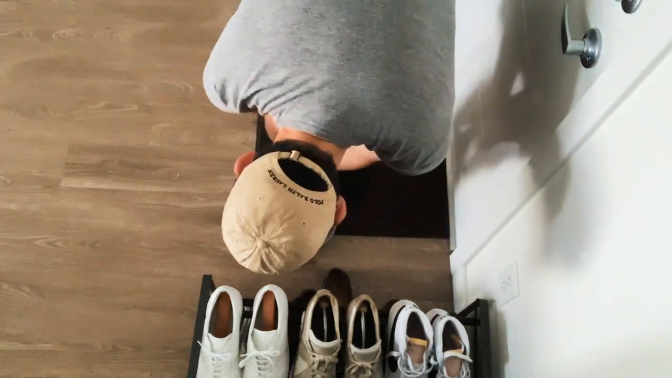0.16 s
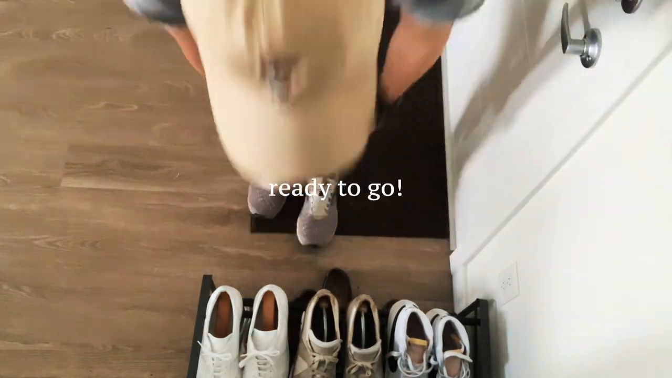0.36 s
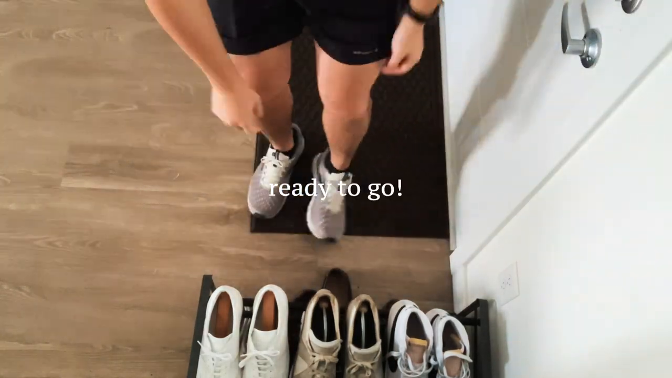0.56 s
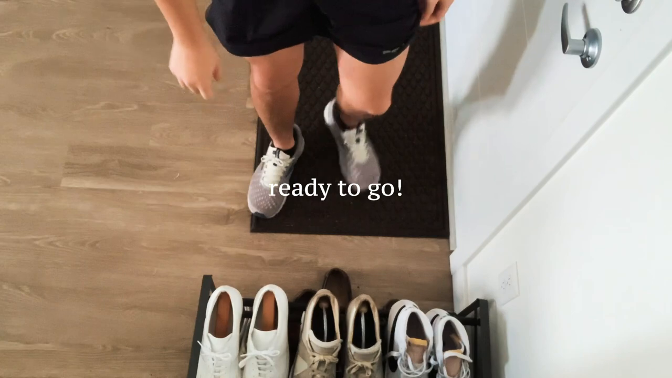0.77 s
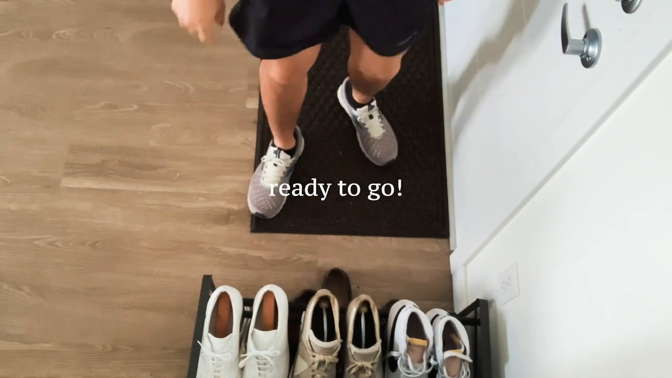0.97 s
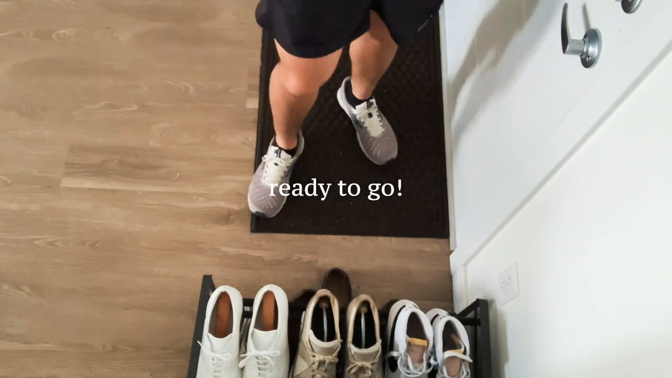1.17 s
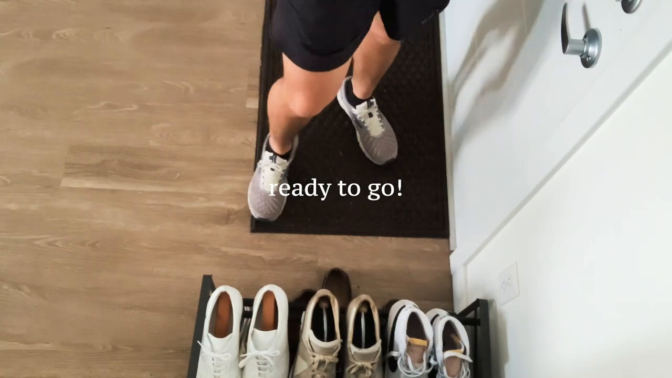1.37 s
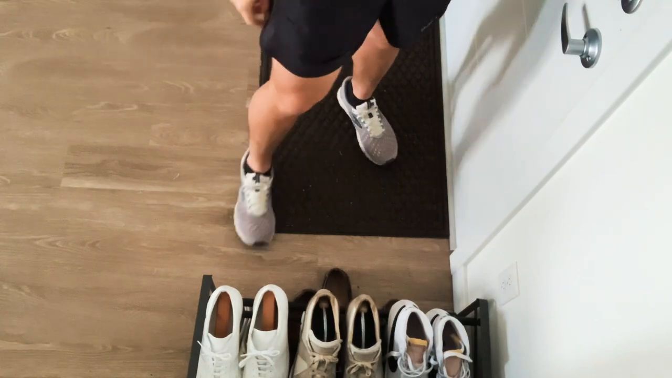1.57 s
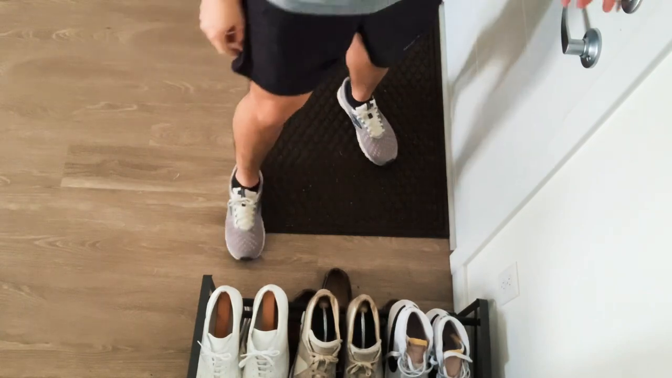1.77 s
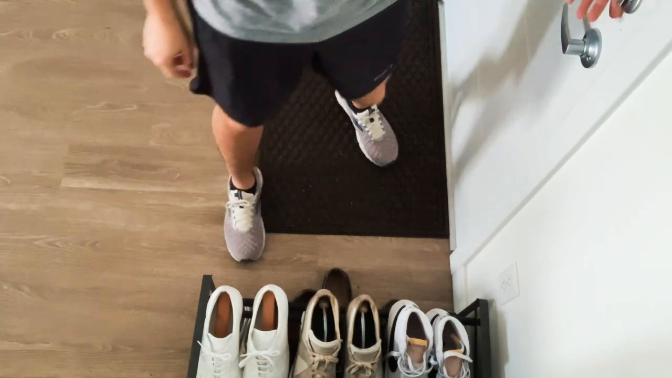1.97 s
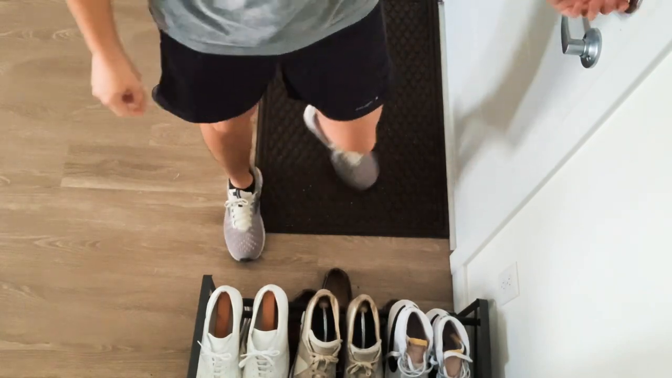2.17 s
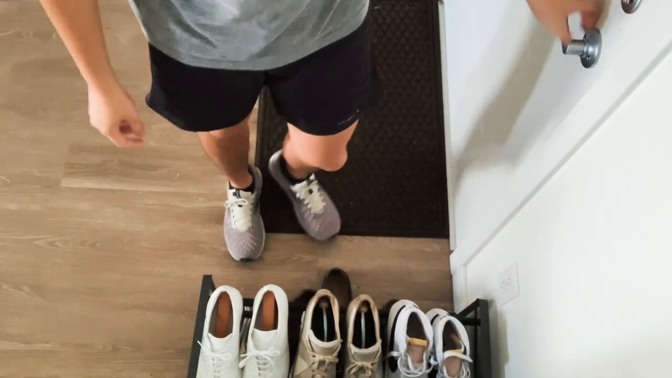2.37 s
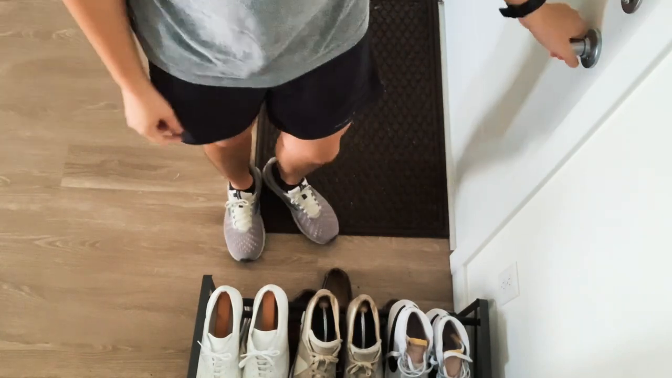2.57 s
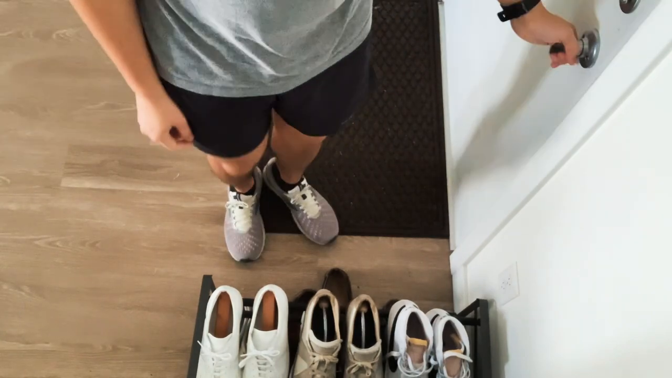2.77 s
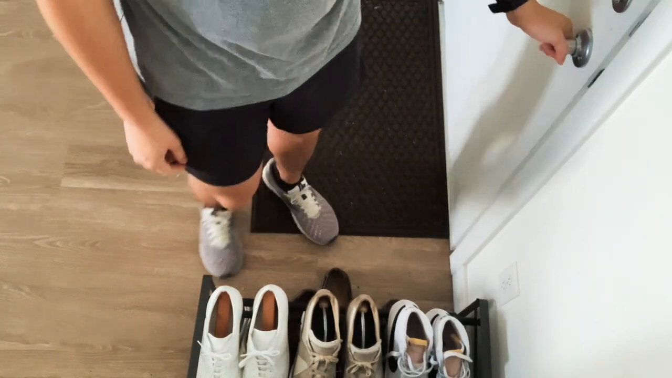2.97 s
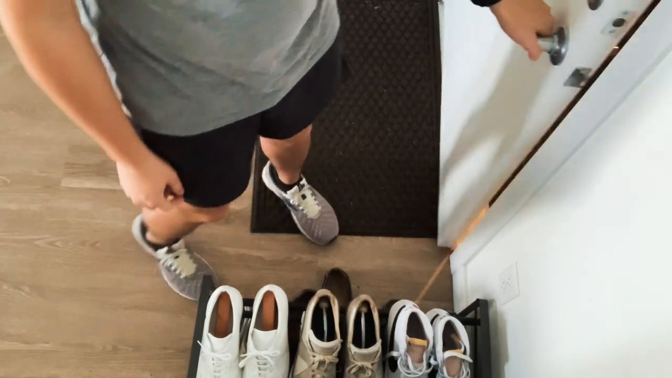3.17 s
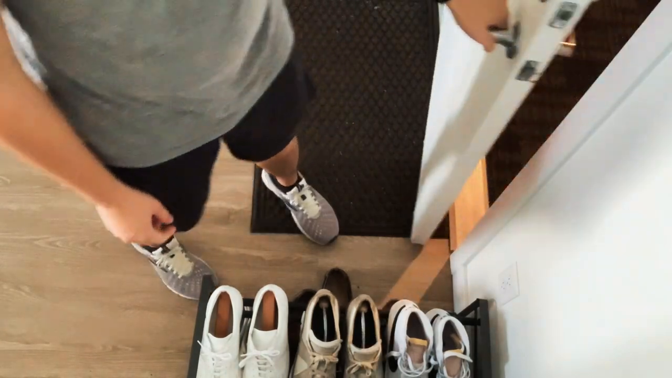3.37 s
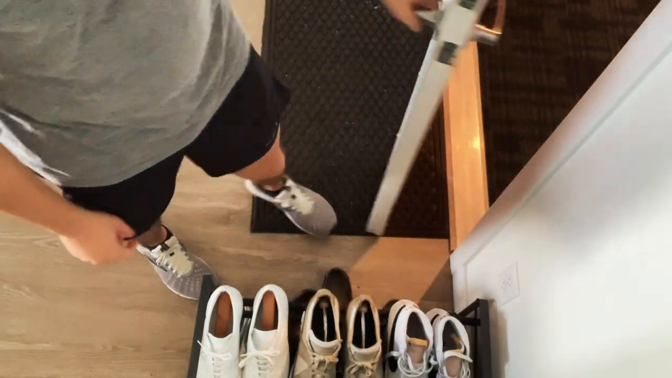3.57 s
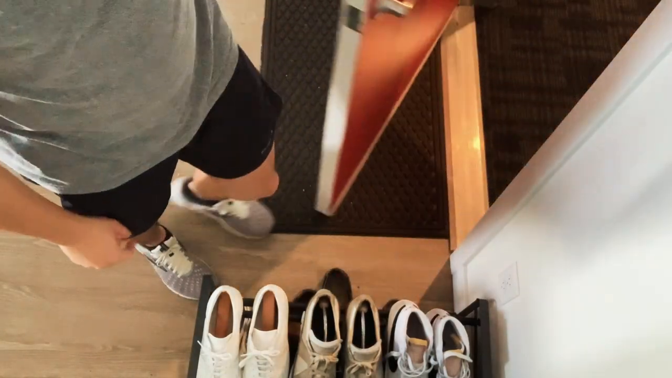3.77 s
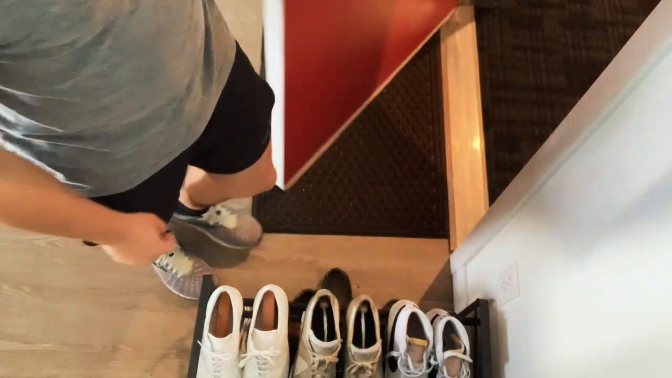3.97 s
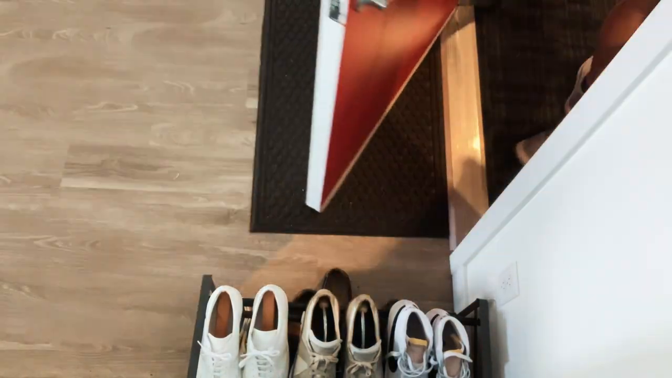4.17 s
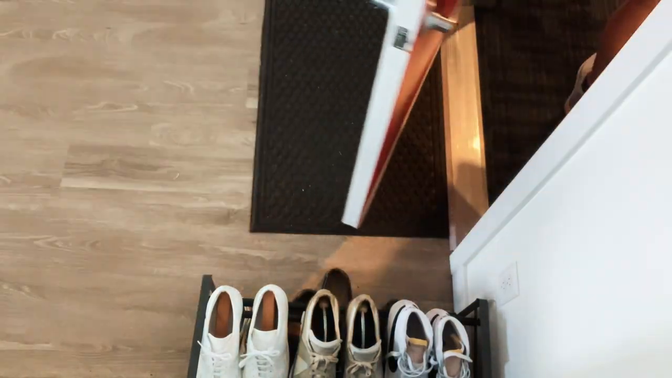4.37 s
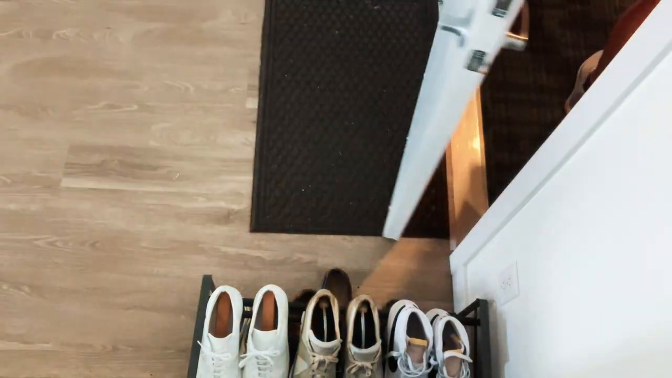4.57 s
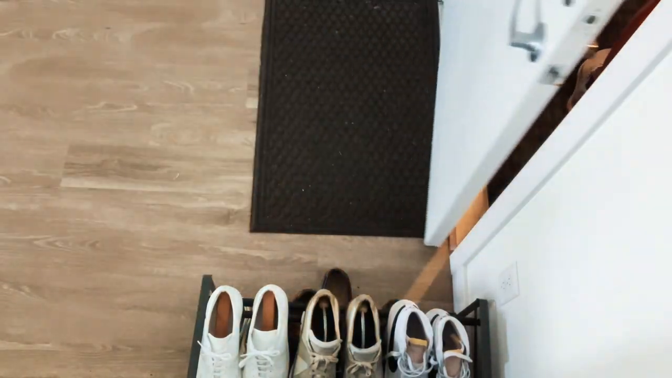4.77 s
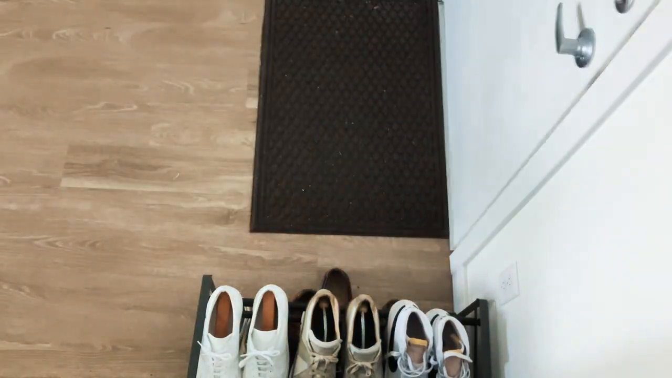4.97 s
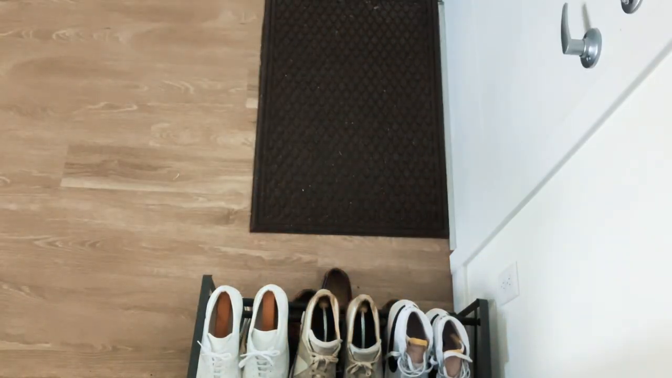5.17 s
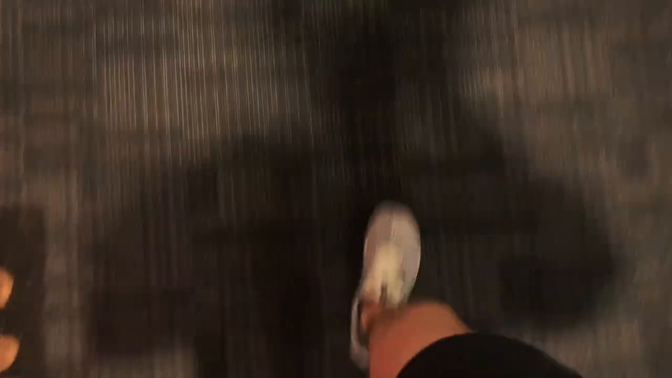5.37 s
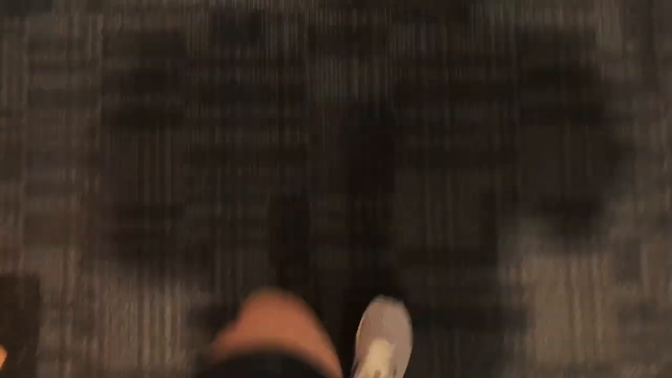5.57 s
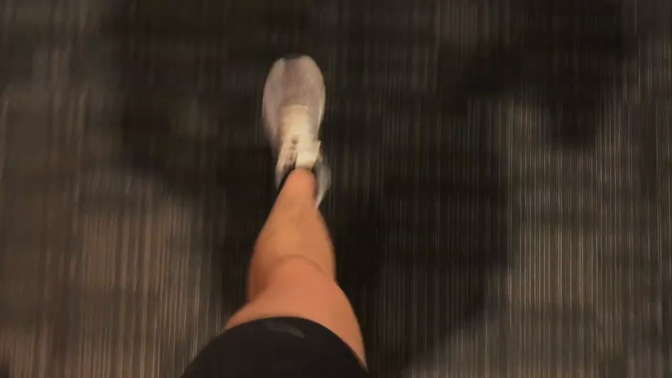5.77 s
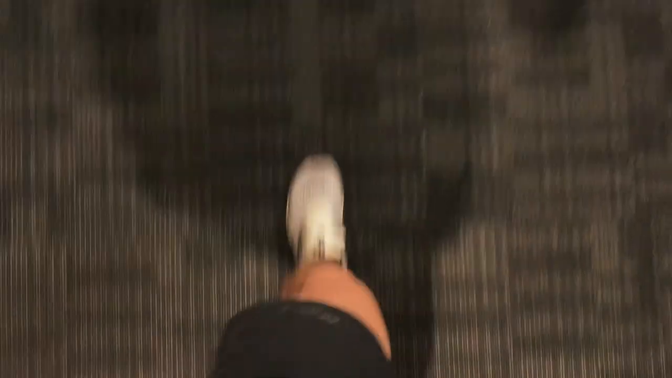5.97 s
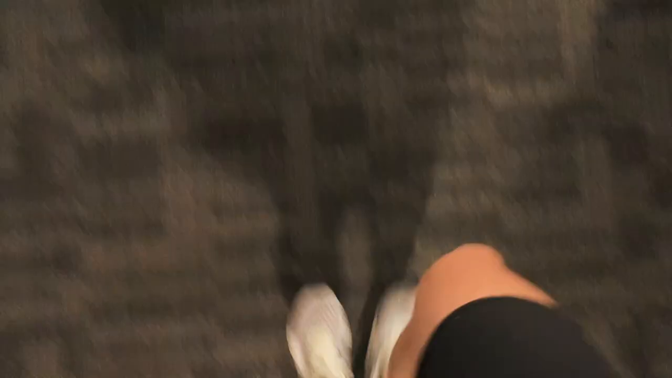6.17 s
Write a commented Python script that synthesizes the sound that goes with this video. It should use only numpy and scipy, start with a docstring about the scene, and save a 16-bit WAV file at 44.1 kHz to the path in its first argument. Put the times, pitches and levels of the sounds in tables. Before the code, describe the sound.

In a small, hard hallway with low ventilation hum, shoes tap faintly. A deadbolt snaps back with metallic ringing, the knob rattles and the heavy door thuds loose from its seal. Dry high hinge squeaks follow, then a short lower creak. The door ticks as it swings back and slams with a boom. An abrupt cut leads to rumbling corridor air, cloth swishes and soft carpet footfalls. Close stereo microphones.

```python
"""An apartment door: the deadbolt turns, the knob is worked and the door is pulled off its seal in a small hallway.
Its hinges squeak, then it swings back ticking and slams. Over it lie a low ventilation hum and, last, a carpeted corridor walk.
Knocks are short noise bursts that set metal and wood ringing; squeaks are gliding tones; air and cloth are coloured noise.
The sound jumps ahead at three cuts, each of which also cuts off the echo."""
import sys
import numpy as np
from scipy import signal
from scipy.fft import rfft, irfft, next_fast_len
from scipy.io import wavfile
from scipy.ndimage import uniform_filter1d

SR = 44100
rng = np.random.default_rng(int(sys.argv[2]) if len(sys.argv) > 2 else 0)


def put_to_file(sound):
    """Save the sound as 16-bit audio at rate SR, in the file named by the first command-line argument."""
    columns = np.atleast_2d(sound).T  # one column per channel
    safe = np.clip(columns, -1, 1)
    whole_steps = np.round(safe * 32767)
    wavfile.write(sys.argv[1], SR, whole_steps.astype(np.int16))


N = 275000
TIME = np.arange(N) / SR

# Levels below are settings within each layer; gains in the functions may shift them.
# "Rise" and "fall" are the times for a factor of e. In colour tables only the shape counts.

# stretches between the cuts, the last one in the corridor: [start t/s, end t/s]
STRETCHES = [(0, .37), (.37, 4.172), (4.172, 5.373), (5.395, 6.3)]

# ventilation tones: [f/Hz, level/dB]
HUM_TONES = [(59.2, -43.5), (171.5, -53), (339, -59.5)]
# colour of the ventilation rush: [f/Hz, level/dB]
AIR_COLOUR = [(15, -12), (32, -10), (42, -4.5), (59, -4), (75, -10), (95, -11), (170, -11.5), (210, -12.5),
              (350, -16), (600, -18.5), (1100, -50.5), (2000, -45), (8600, -50.5), (14000, -59),
              (16000, -76)]
HUM_WAVER_DB, AIR_DB = 0.7, -49
# colour of the corridor rumble: [f/Hz, level/dB]
CORRIDOR_COLOUR = [(15, -28), (35, -9.5), (60, 3.5), (90, -12.5), (120, 3), (160, -9.5), (250, -12.5),
                   (350, -21.5), (600, -25), (1300, -24.5), (2200, -33), (4000, -32), (8000, -85),
                   (16000, -43)]
CORRIDOR_DB = -44

# left-right likeness of diffuse sound, clipped to -1..1 when used: [f/Hz, coherence]
LIKENESS = [(60, 0.97), (130, 0.93), (290, 0.87), (640, 0.29), (1400, 0.045), (3100, 0.081), (6800, -0.074),
            (8500, -1.224), (11000, 0.38), (15000, 0.61)]
# phase between the two microphones in direct sound: [f/Hz, phase by which left leads/rad]
LEFT_LEAD = [(50, -3), (250, -0.4), (600, 0.05), (1300, 1), (3000, -1.65), (5500, -1.56), (7000, -2),
             (8500, -2.5), (11000, -5), (15000, -5.5)]
# time the hallway echo takes to fall by 60 dB: [f/Hz, t60/s]
ECHO_T60 = [(100, .5), (400, 0.14), (1200, 0.7258), (3000, 0.63), (6000, 0.67), (11000, 0.32),
            (15000, 0.36)]
# colour of the hallway echo: [f/Hz, level/dB]
ECHO_COLOUR = [(60, 7), (200, 1.5), (500, 5.5), (1100, -4.5), (2500, 5.5), (5500, 0.5), (11000, 0),
               (14000, 0), (16000, -20)]
CROSSFADE_HZ = 5  # rate of crossfading between the noise tails of the echo

# strides in the corridor; each swishes twice, one leg after the other: [t/s, level/dB]
STRIDES = [(5.617, -53.5), (5.931, -46)]
# colour of the swishing clothes: [f/Hz, level/dB]
STRIDE_COLOUR = [(500, 1.5), (1400, -4.5), (4000, 0), (5100, -13), (6500, 3.5), (9000, -4.5), (11000, -4),
                 (15000, -23)]
SWISH_RISE_S, SWISH_FALL_S = 0.011, 0.031
SECOND_SWISH_S, SECOND_SWISH_DB, RUSTLE_DB = 0.12, -7, -64
# heels landing on the carpet with a dull thump: [t/s, level/dB, f/Hz]
FOOTFALLS = [(5.604, -42, 70.4), (5.84, -36, 54.5), (6.099, -37, 115)]
FOOTFALL_SWELL_S, FOOTFALL_T60_S = 0.0088, 0.2

# strokes of the door sweep on the sill and of clothes: [peak t/s, level/dB, rise/s, fall/s]
BRUSH = [(.85, -70, 0.21, 0.31), (2.14, -55.5, 0.15, 0.19), (2.81, -35.5, 0.026, 0.058),
         (3.32, -41, 0.023, 0.062), (4.15, -47, 0.06, 0.014), (4.88, -51.5, 0.15, 0.16)]
# colour of the brushing: [f/Hz, level/dB]
BRUSH_COLOUR = [(300, -18), (1200, 1.5), (2800, 5), (4500, 0.5), (6500, -4.5), (8500, -41), (11500, -20),
                (15000, -24)]
# soles rubbing on the mat as the weight shifts: [peak t/s, level/dB, rise/s, fall/s]
SOLES = [(.70, -60, 0.048, 0.06), (.87, -62.5, 0.42, 0.55)]
# colour of the soles: [f/Hz, level/dB]
SOLE_COLOUR = [(1000, -24), (2250, -11), (2550, -2.5), (2700, -2), (2950, -9), (6000, -18.5), (9000, -34),
               (12500, -18), (15000, -30)]
# metal sliding on metal in the knob, hinge and latch: [peak t/s, level/dB, rise/s, fall/s]
SCRAPE = [(2.15, -51, 0.014, 0.033), (2.84, -48, 0.045, 0.027), (3.40, -39, 0.017, 0.048),
          (3.53, -38.5, 0.23, 0.069)]
# colour of the scraping: [f/Hz, level/dB]
SCRAPE_COLOUR = [(3000, -4.5), (5500, 7), (7500, 12), (9000, 14.5), (10500, -13), (13500, -3), (16000, -32)]
# dull rush as the door opens, swings and closes: [peak t/s, level/dB, rise/s, fall/s]
DRAUGHT = [(3.17, -41.5, 0.35, 0.21), (4.05, -48, 0.64, 0.58), (5.15, -33, 0.14, 0.14)]
# colour of the rush: [f/Hz, level/dB]
DRAUGHT_COLOUR = [(100, 2), (400, 2.5), (600, -2), (780, -3), (1050, -2), (1600, -3.5), (2100, -15),
                  (2800, -17.5), (5000, -22), (9000, -41)]
STILL_DB, GUST_DB = -60.5, 1.6  # the same rush with the door at rest; its wavering

# faint groans of the door closer on the way out and back: [peak t/s, level/dB, rise/s, fall/s]
GROAN = [(3.92, -51.5, 0.18, 0.14), (4.6, -56, 0.49, 0.23)]
# colour of the groan: [f/Hz, level/dB]
GROAN_COLOUR = [(600, -43), (860, -19.5), (945, 1.5), (1030, -18), (1160, -5), (1270, -15), (2000, -50)]

# the whole door leaf heaving in its frame: [t/s, level/dB, f/Hz, t60/s]
THUDS = [(2.702, -21.5, 54.8, 0.33), (2.792, -7.5, 64.5, 0.12), (3.026, -19, 70.6, 0.24),
         (3.1, -20.5, 69, 0.29), (5.157, -5.5, 65, 0.15), (5.287, -16, 55, 0.14)]
THUD_SWELL_S = 0.013
SWAY_RATIO, SWAY_DB, SWAY_T60_S = 0.687, -17, 0.6  # each heave also sways the frame, lower and longer
# soft pushes that boom in the door panel or floor: [t/s, level/dB]
BOOMS = [(1.353, -35.5), (2.764, -26), (2.795, -26.5), (3.028, -10), (3.066, -31), (5.079, -23),
         (5.138, -18.5)]
# low modes of the hollow panel: [f/Hz, level/dB, t60/s]
PANEL_MODES = [(128.5, 2.5, .26), (168, -15, 0.19), (224, -2, 0.2), (272.2, -4.5, 0.29), (385, -13.5, 0.58),
               (448, -19, 0.27)]
# hollow taps of shoe, floor and door, each with one short ring: [t/s, level/dB, f/Hz, t60/s]
TAPS = [(.651, -42, 2230, 0.011), (1.441, -43, 1100, 0.039), (2.641, -47, 1400, 0.028),
        (4.098, -38, 1840, 0.027), (4.104, -36, 732, 0.031)]

# fingers scuff the lock, the deadbolt judders along its keep and the knob's spindle grates:
# [peak t/s, level/dB, rise/s, fall/s]
SLIDE = [(1.932, -47.5, 0.014, 0.017), (2.085, -56, 0.011, .015), (2.18, -42, 0.043, 0.0215),
         (2.70, -43.5, 0.024, .025)]
# colour of the sliding: [f/Hz, level/dB]
SLIDE_COLOUR = [(400, -10), (750, -6.5), (1050, 1), (1350, -1.5), (1900, -6), (2400, -12), (3000, -18),
                (9000, -44)]
SLIDE_SLIPS_PER_S = 380

# hinge squeaks and the lower creak at the end of the swing: [start t/s, length/s,
# start f/Hz, middle f/Hz, end f/Hz, level/dB, rasp re whistle/dB, octave re its own tone/dB]
SQUEAKS = [(3.155, 0.053, 5650, 5900, 6330, -47, -16, -22), (3.234, 0.034, 5660, 5910, 6000, -44, -16, -30),
           (3.264, .045, 7090, 7130, 7170, -38, -16, -26), (3.309, 0.021, 6620, 6450, 6100, -34, -10, -21),
           (3.312, 0.036, 4590, 4460, 4300, -50, -2, -25),
           (3.324, 0.039, 6420, 6430, 6550, -34.5, -11, -18),
           (3.355, 0.03, 6240, 6320, 6370, -31.5, -7, -16),
           (3.409, 0.019, 5890, 5640, 5270, -31.5, -9.5, -23),
           (3.424, 0.019, 5500, 5700, 5860, -34.5, -11, -20),
           (3.476, 0.015, 5850, 5940, 5830, -35, -14, -19), (3.519, 0.011, 5640, 5590, 5530, -35, -16, -26),
           (3.531, .008, 6350, 6600, 6500, -40, -3, -18), (3.539, .03, 5540, 5550, 5540, -52, -8, -20),
           (4.076, .032, 1660, 1580, 1520, -43, -16, -27),
           (4.098, 0.0775, 1438, 1365, 1270, -39.5, -13, -13.5)]
FLUTTER_DB, WHISTLE_JITTER_HZ, RASP_JITTER_HZ = 2.2, 48, 240  # typical straying of level and pitch
SQUEAK_EDGES = 0.25  # share of a squeak spent swelling and dying
# random chirps of the hinge pin: time span, pitch range before the glide
CHIRP_FROM_S, CHIRP_TO_S, CHIRP_LOW_HZ, CHIRP_HIGH_HZ = 3.385, 3.595, 5510, 9430
CHIRP_LENGTH_S, CHIRP_GLIDE, CHIRP_OCTAVE_DB = 0.012, 0.038, -21  # glide: largest share of the pitch

# light clicks of shoes, lock, knob, hinge and closer:
# [t/s, level/dB, knock re level/dB, sizzle re level/dB, decay/s]
CLICKS = [(.316, -43, -2.5, -2.5, 0.0048), (0.649, -53, 4, -18, .002), (.947, -61, 9, -9, .008),
          (1.438, -57, 12, 0, 0.0028), (1.897, -58, 10, -5, 0.0026), (1.931, -42, 2, -15, 0.0017),
          (2.118, -58, 3, 3, 0.0026), (2.131, -49.5, 4, 7.5, 0.0047), (2.439, -48.5, -14, 16, 0.0028),
          (2.634, -44, 3, -6, .003), (2.642, -46, 3, -12, 0.0023), (2.669, -48, 2, -21, .002),
          (2.685, -40.5, 2, -18, 0.0017), (2.707, -55, 16, -4, 0.0022), (2.798, -40, 0, 8.5, .002),
          (2.85, -43, -11, 4, .001), (2.855, -46, -9, 17, 0.0014), (2.8633, -41, -14, 19, 0.0017),
          (2.943, -54, -6, 12, .001), (2.961, -44, -8, 11.5, .0012), (2.983, -39, -11, 7.5, 0.0024),
          (2.990, -38, -3, 8, 0.0036), (3.839, -59, 10, 5, 0.0027), (4.009, -32.5, -0.5, -2.5, 0.0024),
          (4.043, -47.5, -12, 3.5, 0.0045), (4.105, -45.5, 14, -1, 0.0052), (4.84, -52, 5, -25, 0.0046),
          (4.876, -51.5, 8.5, -26, 0.007), (4.913, -47, 10, -29, .005), (4.956, -46.5, 12, -25, 0.0048),
          (5.08, -37, 3, -25, .004)]
# the swinging door ticks faster, and mostly fainter, as it gathers speed: [t/s, level/dB]
TICKS = [(4.2237, -53.5), (4.277, -55.5), (4.323, -55.5), (4.369, -57.5), (4.411, -58.5), (4.454, -57.5),
         (4.497, -57), (4.544, -55), (4.581, -56.5), (4.630, -56.5), (4.664, -56.5), (4.694, -57)]
TICK_KNOCK_DB, TICK_SIZZLE_DB, TICK_DECAY_S = 11, -1.5, 0.00586  # shared by all ticks
CLICK_RISE_SHARE = 0.25  # of a click's decay

# the deadbolt snaps back and chatters:
# [t/s, knock level/dB, body level/dB, clack level/dB, sizzle level/dB, rise/s]
BOLT_BLOWS = [(2.1895, -35, -38, -32.5, -23, 0.0017), (2.197, -30.5, -40, -31, -28, 0.001),
              (2.207, -31, -48, -36.5, -38.5, 0.0011)]
# a hand grips the lock, the knob draws the latch, the door breaks from its seal and the latch rattles:
# [t/s, knock level/dB, body level/dB, clack level/dB, sizzle level/dB, rise/s]
LATCH_BLOWS = [(1.920, -40.5, -50, -44.5, -62, 0.0092), (2.681, -32, -35, -45.5, -51.5, 0.0062),
               (2.773, -25, -29, -34, -39.5, 0.0022), (2.780, -21.5, -31.5, -38, -39, 0.00089),
               (2.802, -42.5, -38, -51, -40, 0.0011), (2.826, -44, -40, -56, -37, 0.00066),
               (3.012, -25.5, -29, -27.5, -34, 0.0035), (3.021, -24, -24.5, -17.5, -10, 0.00033),
               (3.0262, -22, -25.5, -22, -30, 0.00058), (3.0395, -29, -34, -41, -28, 0.00034),
               (3.044, -24, -33, -40, -38, .0003), (3.061, -34, -34, -36, -44, 0.00032),
               (3.067, -34.5, -28, -36, -44, 0.00023), (3.0705, -36, -38, -31, -31, 0.00033),
               (3.081, -32, -37, -45, -43, 0.00045)]
# the latch meets the strike plate and rides over it, then the door hits its stop:
# [t/s, knock level/dB, body level/dB, clack level/dB, sizzle level/dB, rise/s]
SLAM_BLOWS = [(4.9945, -30.5, -33.5, -25, -23, 0.00074), (5.003, -27.5, -34.5, -30.5, -23, 0.00097),
              (5.1095, -19, -28, -16.5, -18, 0.00069), (5.1145, -12.5, -25, -28, -18, 0.00054),
              (5.125, -22, -34, -34, -40, .0006), (5.143, -29, -34, -31, -42, 0.00054)]
# what the bolt rings with; short modes are broad resonances: [f/Hz, gain/dB, t60/s]
BOLT_RING = [(1290, 3, 0.01), (1544, 14, 0.27), (1986, 2, 0.5), (2686, -9, .35), (3030, -3, 0.22),
             (4440, -5, 0.0046), (4960, 13, .26), (6320, 16, 0.34)]
# what the latch rings with: [f/Hz, gain/dB, t60/s]
LATCH_RING = [(512, -7, .3), (810, 1.5, 0.028), (962, -1, 0.19), (1229, 3, 0.17), (1420, -4, .4),
              (1490, -10, 0.01), (2660, 1, .22), (3000, -10, 0.21), (3570, -10, 0.3), (3760, -3, 0.013),
              (4460, -5, .25)]
# what the slamming door rings with: [f/Hz, gain/dB, t60/s]
SLAM_RING = [(587, 5, 0.36), (728, 10, 0.72), (870, 4, .3), (1004, 7.5, 0.22), (1045, -1.5, 0.017),
             (1097, 6, 0.22), (1186, 7.5, 0.2), (1330, 1, 0.24), (1520, -8, 0.46), (625, -7, 0.041),
             (2124, 4, 0.31), (2510, 10, 0.26), (2760, 7, 0.25), (3240, -1, .45), (4030, -14, 0.025),
             (4600, -7, 0.21), (6740, 5, 0.027)]
# colour of the hard knocks: [f/Hz, level/dB]
KNOCK_COLOUR = [(130, -0.5), (190, -1), (280, -2.5), (380, -8), (500, -2), (660, -4), (1050, -1),
                (1300, -1), (1650, -6), (2100, -2.5), (4000, 2), (5200, -2.5), (8400, -3), (12500, -8),
                (15500, -17)]
BODY_HZ, KNOCK_HZ, CLACK_HZ, SIZZLE_HZ = (130, 500), (500, 1800), (1800, 7000), (9500, 15000)
# in every blow the metal speaks first, then the wood, then the body of the door
WOOD_LAG_S, BODY_LAG_S = 0.001218, 0.00891
SIZZLE_DECAY_S, METAL_DECAY_S, WOOD_DECAY_S, BODY_DECAY_S = 0.002, 0.003, 0.0059, 0.013
SOFT_STRETCH = 1.4  # extra decay per second of rise: a soft contact also lasts longer
REPEAT_S, REPEAT_DB = 0.012, -16.5  # each blow is repeated once, fainter, to thicken it


def amp(db):
    """Decibels to gain."""
    return 10 ** (np.asarray(db) / 20)


def unit(x):
    """Scales to rms 1."""
    return x / np.sqrt(np.mean(x ** 2) + 1e-20)


def read(points, hz):
    """Reads a table between its points on a log-frequency axis."""
    f, value = np.transpose(points)
    return np.interp(np.log(hz + 1), np.log(f + 1), value)


def level(strokes):
    """Gain over time of strokes that each swell to a peak and die away."""
    power = 0
    for s, db, rise, fall in strokes:
        distance = np.maximum((s - TIME) / max(rise, 1e-3), (TIME - s) / max(fall, 1e-3))
        power = power + amp(db) ** 2 * np.exp(-2 * distance)
    return np.sqrt(power)


def add(mix, s, sound):
    """Mixes a sound in at time s."""
    part = mix[max(round(s * SR), 0):][:len(sound)]
    part += sound[:len(part)]


def decay(t, t60):
    """Gain that falls by 60 dB in t60 seconds."""
    return np.exp(-np.log(1000) * t / t60)


def wander(size, hz):
    """Slow chance of about rms 1, its speed limited softly around the given rate."""
    span = next_fast_len(max(size, SR))
    f = np.fft.rfftfreq(span, 1 / SR)
    slow = rfft(rng.standard_normal(span)) * np.exp(-(f / hz) ** 2)
    return unit(irfft(slow, span))[:size]


def diffuse(colour, size=N):
    """Coloured noise as two close microphones hear it."""
    a, b = rfft(rng.standard_normal((2, size)))
    hz = np.fft.rfftfreq(size, 1 / SR)
    same = np.clip(read(LIKENESS, hz), -1, 1)
    pair = np.array([a, same * a + np.sqrt(1 - same ** 2) * b])
    return unit(irfft(pair * amp(read(colour, hz)), size))


def tint(x, colour, size=2048):
    """Filter with the given colour that never sounds ahead of its input."""
    log_gain = np.log(amp(read(colour, abs(np.fft.fftfreq(size, 1 / SR)))))
    response = np.fft.ifft(np.exp(np.conj(signal.hilbert(log_gain)))).real
    return signal.oaconvolve(x, response[:size // 2])[:N]


def during(start, end):
    """One inside a stretch of time, zero outside, with soft edges."""
    return uniform_filter1d(((TIME >= start) & (TIME < end)) * 1., size=64)


def ventilation(drift_rad=0.57):
    """Fan tones wavering in level and phase, in a low rush of air."""
    tones = 0
    for hz, db in HUM_TONES:
        gain = amp(db + HUM_WAVER_DB * wander(N, 0.66))
        tones = tones + gain * np.sin(2 * np.pi * hz * TIME + drift_rad * wander(N, 2.5))
    return np.sqrt(2) * tones + amp(AIR_DB) * diffuse(AIR_COLOUR)


def hallway(x, echo_db, build=0.00066, size=128, count=3):
    """Direct sound with left-right phase shifts, and an echo from three noise tails, crossfaded to keep it smooth."""
    lead = read(LEFT_LEAD, np.fft.rfftfreq(size, 1 / SR))
    direct = np.roll(irfft(np.exp(.5j * np.array([lead, -lead])), size), size // 8, axis=1)
    out = signal.oaconvolve(x[None], direct, axes=1)[:, size // 8:][:, :N]  # undoes the roll's delay
    for k in range(count):
        # each tail is noise that dies at its own speed in each frequency band
        hz, t, z = signal.stft(diffuse([(20, 0), (20000, 0)], size=SR), SR, nperseg=256)
        z = z * amp(read(ECHO_COLOUR, hz))[:, None] * decay(t, read(ECHO_T60, hz)[:, None])
        tail = signal.istft(z, SR, nperseg=256)[1][:, :SR]
        tail = tail * amp(echo_db) * (1 - np.exp(-TIME[:SR] / build))
        share = np.sqrt(2 / count) * np.cos(np.pi * (CROSSFADE_HZ * TIME + k / count))  # squares sum to one
        out += signal.oaconvolve((x * share)[None], tail, axes=1)[:, :N]
    return out


def footfalls():
    """Padded thumps in the corridor floor: low tones that swell softly and die away."""
    out, t = np.zeros(N), np.arange(SR // 2) / SR
    for s, db, hz in FOOTFALLS:
        swell = 1 - np.exp(-(t / FOOTFALL_SWELL_S) ** 2)
        add(out, s, amp(db) * swell * decay(t, FOOTFALL_T60_S) * np.sin(2 * np.pi * hz * t))
    return out


def corridor(grain_db=1.0):
    """Steady rumble of the corridor, clothes swishing with each stride, and footfalls."""
    strokes = []
    for s, db in STRIDES:
        for lag, less in [(0, 0), (SECOND_SWISH_S, SECOND_SWISH_DB)]:
            strokes.append((s + lag, db + less, SWISH_RISE_S, SWISH_FALL_S))
    gain = np.hypot(level(strokes), amp(RUSTLE_DB)) * amp(grain_db * wander(N, 94))
    return amp(CORRIDOR_DB) * diffuse(CORRIDOR_COLOUR) + gain * diffuse(STRIDE_COLOUR) + footfalls()


def movement(grain_db=1.0):
    """Grainy brushing, rubbing soles, scraping metal and the rush of air around the moving door."""
    rubbing = level(BRUSH) * diffuse(BRUSH_COLOUR) + level(SOLES) * diffuse(SOLE_COLOUR)
    rubbing = rubbing * amp(grain_db * wander(N, 110) - 3.0)
    scraping = level(SCRAPE) * amp(2.7 * wander(N, 286) - 2.5) * diffuse(SCRAPE_COLOUR)
    gust = np.hypot(level(DRAUGHT), amp(STILL_DB)) * amp(GUST_DB * wander(N, 21.7))
    return rubbing + scraping + gust * diffuse(DRAUGHT_COLOUR)


def closer(waver_db=4.5):
    """Oil forced through the door closer: two fuzzy, wavering resonances."""
    return level(GROAN) * amp(waver_db * wander(N, 14)) * diffuse(GROAN_COLOUR)


def leaf():
    """The heavy leaf rocks against its seal and pumps the air of the hallway."""
    out, t = np.zeros(N), np.arange(SR) / SR
    swell = 1 - np.exp(-(t / THUD_SWELL_S) ** 2)
    for s, db, hz, t60 in THUDS:
        rock = decay(t, t60) * np.sin(2 * np.pi * hz * t)
        sway = amp(SWAY_DB) * decay(t, SWAY_T60_S) * np.sin(2 * np.pi * SWAY_RATIO * hz * t)
        add(out, s, -amp(db) * swell * (rock + sway))
    return out


def panel(swell=0.0021):
    """The hollow panel booms in a few low modes."""
    out, t = np.zeros(N), np.arange(SR) / SR
    boom = sum(amp(db) * decay(t, t60) * np.sin(2 * np.pi * hz * t) for hz, db, t60 in PANEL_MODES)
    for s, db in BOOMS:
        add(out, s, amp(db - 12.0) * boom * (1 - np.exp(-t / swell)))
    return out


def taps(swell=0.0018, scatter=0.12):
    """Compact hollow taps: short tones, unsteady in pitch."""
    out, t = np.zeros(N), np.arange(SR // 8) / SR
    for s, db, hz, t60 in TAPS:
        turn = 2 * np.pi * np.cumsum(hz * (1 + scatter * wander(len(t), 370))) / SR
        add(out, s, 2 * amp(db) * (1 - np.exp(-t / swell)) * decay(t, t60) * np.sin(turn))
    return out


def sliding(grain_db=4):
    """Metal drawn along metal: runs of tiny random slips, coloured by a filter."""
    slips = (rng.random(N) < SLIDE_SLIPS_PER_S / SR) * rng.choice([-1., 1.], N)
    slips = slips * amp(grain_db * rng.uniform(-0.71, 1, N))
    return level(SLIDE) * unit(tint(slips, SLIDE_COLOUR))


def chirps(count=40):
    """The squeal breaks up into tiny gliding chirps, most of them low in its range."""
    out, u = np.zeros(N), np.linspace(-1, 1, round(CHIRP_LENGTH_S * SR))
    for k, (when, height, glide, size) in enumerate(rng.random((count, 4))):
        middle_hz = CHIRP_LOW_HZ * (CHIRP_HIGH_HZ / CHIRP_LOW_HZ) ** (height ** 2.3)
        hz = middle_hz * (1 + CHIRP_GLIDE * (2 * glide - 1) * u)
        turn = 2 * np.pi * np.cumsum(hz) / SR
        chirp = (np.sin(turn) + amp(CHIRP_OCTAVE_DB) * np.sin(2 * turn)) * np.cos(np.pi * u / 2)
        s = CHIRP_FROM_S + (CHIRP_TO_S - CHIRP_FROM_S) * (k + when) / count
        add(out, s, amp(-44 - 2 * size) * chirp)
    return out


def hinge(squeak_db=2):
    """Dry metal sticks and slips: an unsteady whistle and a rasp of uneven slips, each with its octave."""
    out = np.zeros(N)

    def tone(bend, jitter_hz, octave_db):
        phase = 2 * np.pi * np.cumsum(bend + jitter_hz * wander(len(bend), 570)) / SR
        return np.sin(phase) + amp(octave_db) * np.sin(2 * phase)

    for s, length, first_hz, middle_hz, last_hz, db, rasp_db, octave_db in SQUEAKS:
        u = np.linspace(0, 1, round(length * SR))
        bend = np.polyval(np.polyfit([0, .5, 1], [first_hz, middle_hz, last_hz], 2), u)
        whistle = tone(bend, WHISTLE_JITTER_HZ, octave_db)
        rasp = tone(bend, RASP_JITTER_HZ, octave_db)
        gain = amp(db + squeak_db + FLUTTER_DB * wander(len(u), 165))
        add(out, s, gain * signal.windows.tukey(len(u), SQUEAK_EDGES) * (whistle + amp(rasp_db) * rasp))
    return out


def contact(bands, rise, fall, crack, size=6000):
    """A sharp crack and a rattle that swells and quickly dies, without ring, with a level for each band."""
    t = np.arange(size) / SR
    fade = (1 - np.exp(-t / max(rise, 1e-5))) * np.exp(-t / max(fall, 5e-4))
    fade /= np.sqrt(fade.max())
    burst = rng.standard_normal(size) * fade
    burst[fade.argmax() // 2] += crack * np.exp(-rise / 0.0079)  # a soft contact hardly cracks
    # make all frequencies equally strong, keeping the timing
    burst = irfft(np.exp(1j * np.angle(rfft(burst))), size) * fade ** .15
    out = np.zeros(size)
    for edges, db in bands:
        part = signal.sosfilt(signal.butter(3, edges, "bandpass", fs=SR, output="sos"), burst)
        out += amp(db) * unit(part) * np.sqrt(np.mean(fade ** 2))
    return out


def clicks(click_db=2):
    """Light dry contacts: single clicks and the ticking of the swinging door."""
    out = np.zeros(N)
    ticks = [(s, db, TICK_KNOCK_DB, TICK_SIZZLE_DB, TICK_DECAY_S) for s, db in TICKS]
    for s, db, knock, sizzle, fall in CLICKS + ticks:
        bands = [(KNOCK_HZ, knock), (CLACK_HZ, 0), (SIZZLE_HZ, sizzle)]
        add(out, s, amp(db + click_db) * contact(bands, CLICK_RISE_SHARE * fall, fall, crack=3.7))
    return out


def blows(rows, blow_db=1.5):
    """Hard contacts of metal and wood, each with one faint repeat."""
    out = np.zeros(N)
    for s, knock, body, clack, sizzle, rise in rows:
        edge, metal, wood = [(SIZZLE_HZ, sizzle)], [(CLACK_HZ, clack)], [(KNOCK_HZ, knock)]
        parts = [(0, 0, edge, SIZZLE_DECAY_S),
                 (0, 0, metal, METAL_DECAY_S),
                 (WOOD_LAG_S, 0, wood, WOOD_DECAY_S),
                 (BODY_LAG_S, 0, [(BODY_HZ, body)], BODY_DECAY_S),
                 (REPEAT_S, REPEAT_DB, edge + metal + wood, WOOD_DECAY_S)]
        for lag, db, bands, fall in parts:
            hit = contact(bands, rise, fall + SOFT_STRETCH * rise, crack=5.5)
            add(out, s + lag, amp(db + blow_db) * hit)
    return out


def ringing(x, modes):
    """Adds the resonances of a struck part to the blows."""
    t = np.arange(SR) / SR
    ring = np.zeros(SR)
    for hz, db, t60 in modes:
        peak = 2 * np.log(1000) / (t60 * SR)  # makes the gain hold at the resonance
        ring += peak * amp(db - 60 * t / t60) * np.cos(2 * np.pi * hz * t)
    return x + signal.oaconvolve(x, ring)[:N]


def hardware():
    """Bolt, latch and slamming door each ring in their own modes; light clicks are dry."""
    bolt = ringing(blows(BOLT_BLOWS), BOLT_RING)
    latch = ringing(blows(LATCH_BLOWS), LATCH_RING)
    slam = ringing(blows(SLAM_BLOWS), SLAM_RING)
    return tint(bolt + latch + slam + clicks(), KNOCK_COLOUR)


def scene():
    """Each hallway stretch holds the background and only its own echoes; the corridor comes last."""
    low = (ventilation() + leaf()) * amp([[-.4], [.4]])  # slightly stronger on the right
    indoors = low + movement() + closer()
    squeaks = hinge() + chirps()
    knocks = hardware() + panel() + taps() + sliding()
    out = np.zeros((2, N))
    for stretch in STRETCHES[:-1]:
        inside = during(*stretch)
        door = hallway(knocks * inside, echo_db=-33.5) + hallway(squeaks * inside, echo_db=-42.5)
        out += inside * (indoors + door)  # a cut takes the tail with it
    return out + during(*STRETCHES[-1]) * corridor()


def record(dry):
    """A low-pass filter takes away the treble above about 16 kHz."""
    lowpass = signal.firwin(511, 16100, window=("kaiser", 9), fs=SR)
    return signal.oaconvolve(dry, lowpass[None], "same", axes=1)


dry = scene()
out = record(dry)
put_to_file(out)
```